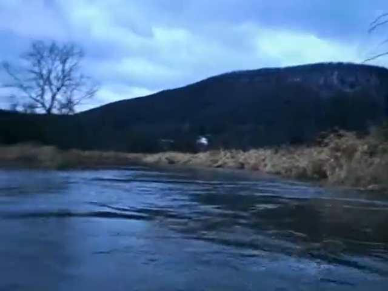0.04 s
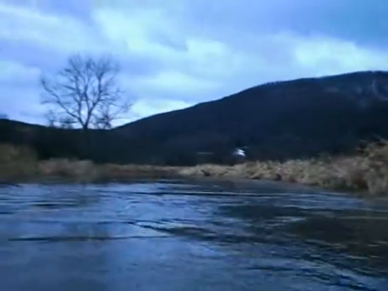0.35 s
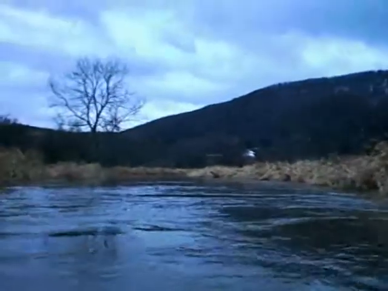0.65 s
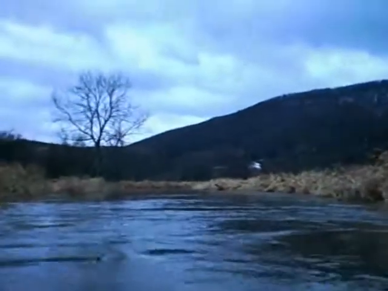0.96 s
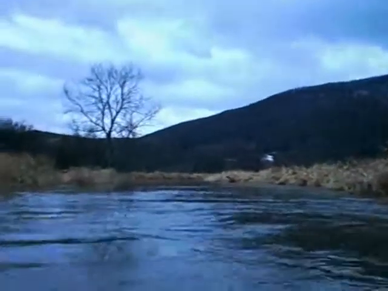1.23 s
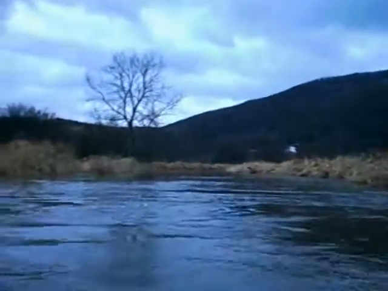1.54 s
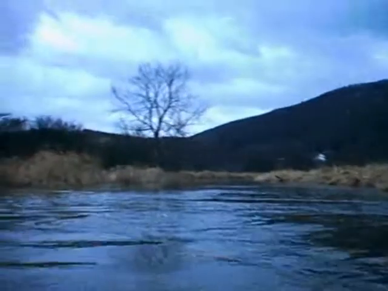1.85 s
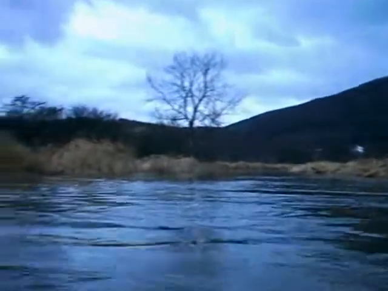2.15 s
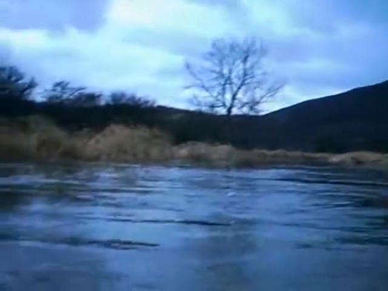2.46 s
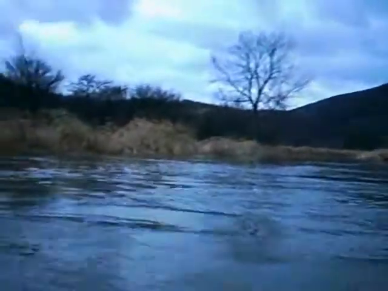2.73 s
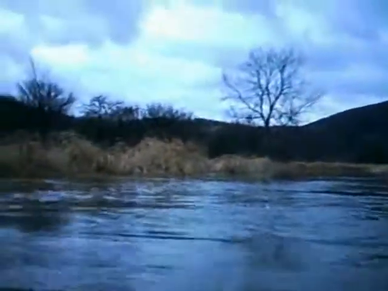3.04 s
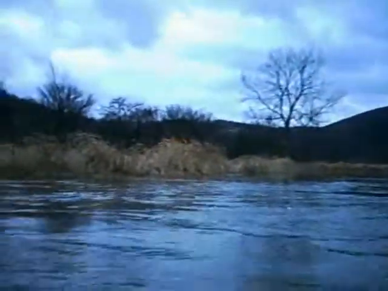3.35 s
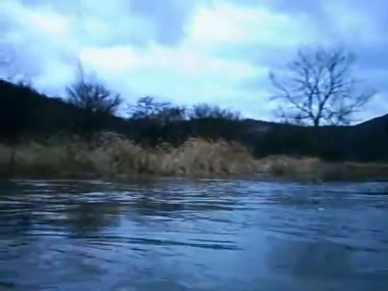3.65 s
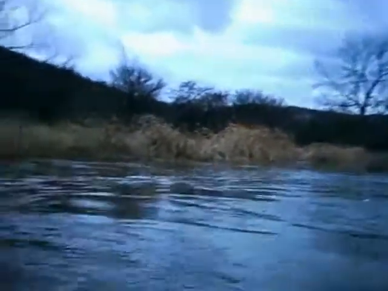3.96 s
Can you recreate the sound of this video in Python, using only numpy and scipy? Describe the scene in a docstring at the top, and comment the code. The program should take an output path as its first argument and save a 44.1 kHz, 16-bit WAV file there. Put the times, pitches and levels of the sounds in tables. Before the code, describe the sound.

Water laps and bubbles at a kayak's bow, heard close from the deck. A small wave washes past first, then lighter plips, glugs and splashes follow, with dull hull bumps over a faint river rush. The sound is slightly muffled.

```python
"""Kayak on a rippling river

Wavelets break at the bow into a fizz of tiny ringing bubbles, with single plips and rising glugs.
One wave washes along the boat in the first second. Water bumps the hollow hull, and the river
rushes farther off. We listen from a small waterproof camera on the deck. Its case rings a little,
and its low-quality recorder dulls the treble and overloads on the closest splashes."""
import sys
import numpy as np
from scipy import signal
from scipy.fft import rfft, irfft
from scipy.io import wavfile

SR = 44100
rng = np.random.default_rng(int(sys.argv[2]) if len(sys.argv) > 2 else 0)


def int16_out(signal):
    """Quantize to a 16-bit WAV file."""
    q = np.round(np.clip(np.atleast_2d(signal).T, -1, 1) * 32767)
    wavfile.write(sys.argv[1], SR, q.astype(np.int16))


N = 176400
TIME = np.arange(N) / SR


def from_db(db):
    """Turn decibels into a number to multiply a sound by."""
    return 10 ** (np.asarray(db) / 20)


def rms_one(x):
    """Scale a sound so that its average strength (rms) is 1."""
    return x / np.sqrt(np.mean(x ** 2) + 1e-20)


def add(out, start_s, sound):
    """Mix a sound in at its start time."""
    i = max(0, int(start_s * SR))
    out[i:i + len(sound)] += sound[:max(0, N - i)]


def shape_tone(x, points):
    """Make some pitches louder and others softer, following (pitch_hz, gain_db) points."""
    size = 2 * N
    hz, db = np.transpose(points)
    grid_hz = np.maximum(np.arange(N + 1) * SR / size, 1)
    gain = from_db(np.interp(np.log(grid_hz), np.log(hz), db))
    # minimum phase: the filter rings only after a sound, never before it
    cepstrum = irfft(np.log(gain))
    cepstrum[1:N] *= 2
    cepstrum[N + 1:] = 0
    return irfft(rfft(x, size) * np.exp(rfft(cepstrum)))[:N]


def band_noise(low_hz, high_hz, samples):
    """A hiss that lies mostly between two pitches."""
    band = signal.butter(2, [low_hz, high_hz], "band", fs=SR, output="sos")
    return rms_one(signal.sosfilt(band, rng.standard_normal(samples)))


def drift(rate_hz):
    """A smooth random wobble between -2 and 2, changing about rate_hz times a second."""
    white = rfft(rng.standard_normal(N))
    hz = np.arange(len(white)) * SR / N
    smooth = irfft(white / (1 + (hz / rate_hz) ** 4), N)
    return np.clip(rms_one(smooth), -2, 2)


def bubble(hz, ring_s):
    """One bubble's note swells and dies away while its pitch climbs."""
    rise = 0.02  # the pitch climbs 2% per ring time
    age = TIME[:int(8 * ring_s * SR) + 2] / ring_s
    return age * np.exp(1 - age) * np.sin(2 * np.pi * hz * ring_s * (age + rise * age ** 2 / 2))


def bubble_cloud(per_s, low_hz, high_hz, cycles, spread_db, busy=np.ones(N)):
    """Random bubbles that ring for about `cycles` swings; fewer but louder where `busy` is below 1."""
    out, draws = np.zeros(N), rng.random((16000, 6))
    for when, pitch, size, ring, sign, chance in draws[:int(per_s * N / SR)]:
        share = busy[int(when * N)]
        if chance > share:
            continue
        hz = low_hz + (high_hz - low_hz) * pitch
        size_db = min(-spread_db * np.log(1 - size), 4)  # the largest are 4 dB above the smallest
        gain = from_db(size_db) * np.sign(sign - .5) / np.sqrt(share)
        add(out, when * N / SR, gain * bubble(hz, cycles * (.5 + ring) / hz))
    return rms_one(out)


# The tone of the distant water: pitch_hz, gain_db
RIVER_TONE = [(25, -28.5), (60, -14), (130, -9.5), (300, -4.5), (700, -7.5), (1500, 0.5), (2800, 2.5),
              (3700, 4), (4300, -7.5)]

def river():
    """The even rush of the water farther off."""
    loudness = from_db(-24 + 0.4 * drift(rate_hz=42))
    return loudness * rms_one(shape_tone(rng.standard_normal(N), RIVER_TONE))


def droplets():
    """Tiny drops fall back on the water with sparse, sharp ticks."""
    return from_db(-26) * bubble_cloud(per_s=41, low_hz=3100, high_hz=4040, cycles=2.2, spread_db=0.5)


# Low thumps on the loudest splashes: start_s, level_db, pitch_hz, decay_s
LOW_THUMPS = [(0.275, -30.5, 102, 0.013), (0.599, -28, 121, 0.006), (0.733, -22, 140, 0.03),
              (3.7199, -18.5, 85.7, 0.0057)]

def thumps():
    """Short, low thumps with a burst of noise, mostly the sound of the recorder overloading."""
    out, t = np.zeros(N), TIME[:SR // 5]
    for start_s, level_db, pitch_hz, decay_s in LOW_THUMPS:
        note = np.sin(2 * np.pi * pitch_hz * t)
        burst = from_db(-5) * band_noise(low_hz=pitch_hz, high_hz=900, samples=len(t))
        add(out, start_s, from_db(level_db) * np.exp(-t / decay_s) * (note + burst))
    return out


# The tone of the hollow hull: pitch_hz, gain_db
HULL_TONE = [(70, -21), (140, -4), (200, 0), (355, 5.5), (600, 5.5), (900, -9), (2000, -20.5)]
# Water bumping the hull: start_s, level_db, decay_s
HULL_BUMPS = [(0.73, -13, .022), (0.752, -22, 0.014), (1.09, -17, 0.0047), (1.302, -22, 0.032),
              (1.826, -25, 0.12), (2.09, -27.5, 0.024), (2.143, -20.5, 0.0071), (2.197, -15, 0.0061),
              (3.404, -18, 0.017), (3.43, -22, 0.032), (3.471, -24.5, 0.017), (3.511, -21.5, 0.035),
              (3.597, -23.5, 0.024)]

def hull_bumps():
    """The hull gives a dull, hollow rumble each time water bumps it."""
    loudness, t = np.zeros(N), TIME[:SR // 2]
    fade_in = np.minimum(t / 0.00088, 1)
    for start_s, level_db, decay_s in HULL_BUMPS:
        add(loudness, start_s, from_db(level_db) * fade_in * np.exp(-t / decay_s))
    return loudness * rms_one(shape_tone(rng.standard_normal(N), HULL_TONE))


# Large bubbles coming to the surface: start_s, level_db, start_hz, end_hz, length_s
LARGE_BUBBLES = [(0.051, -17.5, 845, 1750, 0.044), (.69, -16, 791, 800, 0.067),
                 (0.874, -12.5, 832, 2040, 0.017), (0.959, -16, 750, 1200, 0.0086),
                 (1.004, 0, 2030, 3000, 0.0091), (1.947, -17, 907, 1800, 0.027),
                 (2.123, -14.5, 804.4, 870, 0.033), (2.157, -12.5, 1000, 1455, 0.017),
                 (2.275, -17.5, 804, 797, 0.062), (2.652, -14, 639, 1143, 0.035),
                 (2.808, -10, 1240, 1500, 0.015), (3.235, -13.5, 1070, 1300, 0.009),
                 (3.256, -11, 1352, 1860, 0.027), (3.723, -4.5, 1367, 1316, 0.013),
                 (3.897, -16.5, 900, 860, 0.018), (3.922, -17, 920, 1300, 0.016),
                 (3.948, -16, 1360, 1900, 0.015)]

def glugs():
    """Pockets of air ring with a wobbling loudness; most slide up in pitch, faster and faster."""
    out = np.zeros(N)
    for start_s, level_db, start_hz, end_hz, length_s in LARGE_BUBBLES:
        age = np.linspace(0, 1, int(length_s * SR))
        hz = start_hz + (end_hz - start_hz) * age ** 1.7
        swell = np.minimum(age / 0.23, 1) * np.sqrt(1 - age)  # loudest 23% of the way through
        note = np.sin(2 * np.pi * np.cumsum(hz) / SR)
        add(out, start_s, from_db(level_db + 1) * swell * note)
    wobble_db = 1.5 * drift(rate_hz=170)
    return out * from_db(wobble_db)


# Wavelets that land flat: start_s, level_db, decay_s
FLAT_WAVELETS = [(0.271, -7, 0.011), (2.5398, 0, 0.0056), (2.5842, -3, 0.0048), (2.675, -7.5, 0.012),
                 (3.7207, -2, 0.0068), (3.781, -6, 0.011)]

def splats():
    """A wavelet slaps down and bursts into a rough spray that dies within moments."""
    loudness, t = np.zeros(N), TIME[:SR // 5]
    for start_s, level_db, decay_s in FLAT_WAVELETS:
        add(loudness, start_s, from_db(level_db) * np.exp(-t / decay_s))
    return loudness * band_noise(low_hz=1200, high_hz=2870, samples=N)


# Single bubbles close by: start_s, level_db, pitch_hz, ring_ms
CLOSE_BUBBLES = [(0.001, 10, 1697, 1.25), (0.014, -5, 2800, 3.1), (0.043, -3, 2535, 1.4),
                 (0.0516, -1.5, 2650, 0.98), (0.1551, -1, 1504, 1), (0.2244, -1, 2490, 1.4),
                 (0.2693, 0, 2520, 1.6), (0.2761, 2, 1903, 2.17), (0.3157, -6, 2446, 2.7),
                 (0.3583, -3, 2580, 2.6), (0.388, -2, 977, 1.3), (0.394, -2, 1358, 1.8),
                 (0.4224, -3.5, 2355, 6), (0.449, 0.5, 2450, 1.2), (0.4525, 0.5, 2810, 2),
                 (0.461, -2.5, 2670, 3.2), (0.5072, -3, 2760, 2.6), (0.516, -4.5, 2870, 1.5),
                 (0.547, -4.5, 2430, 1.7), (0.5266, -1.5, 2210, 2.6), (0.557, -5, 2730, 1.6),
                 (0.568, -1.5, 2717, 1.6), (0.5942, -1.5, 992, 3.8), (0.632, -8.5, 880, 1.8),
                 (0.6368, -4.5, 2663, 2.9), (0.649, -4.5, 2760, 1.76), (0.659, -3.5, 2210, 0.91),
                 (0.6642, -2.5, 2400, 0.96), (0.6785, -5, 2730, 0.79), (0.6861, -2.5, 2495, 0.78),
                 (0.7282, -5.5, 880, 1.8), (0.766, 2, 2316, 0.41), (0.775, 2, 2680, 1.16),
                 (0.848, 0, 2790, 1.6), (0.8774, -5, 1400, 1.5), (0.8965, -0.5, 2710, 1.67),
                 (0.942, 1, 2750, 0.96), (0.9684, 4, 2420, 0.88), (1.0354, -9.5, 2330, 2.6),
                 (1.0929, -4, 2390, 1.1), (1.1356, -9, 2130, 1.1), (1.1878, -11.5, 2560, 1.3),
                 (1.275, -10.5, 2360, 0.98), (1.378, -8, 2800, 0.55), (1.3917, -5, 3740, 1.55),
                 (1.469, -12.5, 1400, 1.3), (1.559, -2.5, 3440, 0.69), (1.696, -8.5, 2730, 2.9),
                 (1.7076, -4.5, 3020, 2), (1.7281, 2, 1670, 0.53), (1.7396, 2.5, 2460, 0.17),
                 (1.805, 3.5, 2750, 0.88), (1.815, -7, 2610, 1.5), (1.827, -7.5, 2140, 1.5),
                 (1.866, -9.5, 2720, 2.2), (1.9292, 1, 2830, 0.97), (1.9854, 3, 1880, 0.88),
                 (2.0526, -6, 2960, 0.74), (2.1234, -5.5, 2570, 0.67), (2.1272, -8.5, 797, 2.8),
                 (2.2685, -4, 2830, 1.1), (2.3474, -5.5, 2780, 2.4), (2.385, -8, 2170, 0.4),
                 (2.4744, -6.5, 1370, 1.1), (2.4998, -7.5, 2880, 1.2), (2.5386, -1.5, 1805, 1),
                 (2.5838, -1.5, 950, 0.83), (2.6088, -5.5, 2680, 1.4), (2.6244, -7.5, 2830, 0.57),
                 (2.642, -11.5, 2120, 1.7), (2.6513, -4.5, 2000, 1.57), (2.6618, -4, 1044, 1.1),
                 (2.678, -5.5, 2100, 1.15), (2.6835, 0.5, 1820, 0.52), (2.7331, -7, 2520, 0.75),
                 (2.7453, -4.5, 2880, 1.2), (2.8352, -3.5, 2755, 1.6), (2.86, -4, 2800, 3.3),
                 (2.8789, 3.5, 3135, 1.2), (2.8928, -5.5, 2640, 2.1), (2.9159, -3, 2476, 2.3),
                 (2.9608, -1.5, 1890, 0.61), (3.0143, -10, 2010, 1.1), (3.1231, -6.5, 2310, 3),
                 (3.1378, -2.5, 2650, 1.3), (3.189, -8, 2680, 0.98), (3.2148, -5.5, 1500, 0.69),
                 (3.2563, -5.5, 1737, 1.4), (3.27, -9, 1680, 2), (3.2983, 0, 2776, 0.91),
                 (3.3706, -5.5, 2020, 1.26), (3.3832, -4, 2180, 0.39), (3.4113, 5.5, 2823, 0.68),
                 (3.4141, -2.5, 2780, 0.77), (3.4316, -5.5, 672, 0.66), (3.516, -8.5, 1430, 1.24),
                 (3.551, -9.5, 2750, 1.15), (3.576, -10.5, 2000, 0.7), (3.5833, -2.5, 1696, 1.5),
                 (3.712, -8, 2780, 1.6), (3.721, 3.5, 1410, 0.84), (3.725, -7, 2690, 3.2),
                 (3.754, -8, 2370, 0.76), (3.7886, -1.5, 2730, 0.9), (3.802, -6, 1700, 0.71),
                 (3.8134, -3, 2180, 1.2), (3.8305, -7.5, 2590, 1.6), (3.8398, -7.5, 2540, 1.9),
                 (3.849, -7, 2360, 1.1), (3.9368, -2, 2620, 2.2), (3.952, -4.5, 2740, 1.4),
                 (3.9568, -6, 2030, 1.6), (3.984, -8.5, 2650, 3.3)]

def plips():
    """Each close bubble rings briefly, trailed by a short spray of smaller ones."""
    notes, spray_loudness = np.zeros(N), np.zeros(N)
    spray_fade = np.exp(-TIME[:SR // 20] / 0.0052)
    for start_s, level_db, pitch_hz, ring_ms in CLOSE_BUBBLES:
        add(notes, start_s, from_db(level_db + 2) * bubble(pitch_hz, ring_ms / 1000))
        add(spray_loudness, start_s, from_db(level_db - 8) * spray_fade)
    spray = bubble_cloud(per_s=2400, low_hz=734, high_hz=4520, cycles=1.0, spread_db=0.5)
    spray = shape_tone(spray, [(600, -15.0), (1200, -5.5), (2600, 12), (4000, 5.5)])
    return notes + spray_loudness * rms_one(spray)


# The tone of the small, fizzing bubbles: pitch_hz, gain_db
FIZZ_TONE = [(700, -19), (1300, -16), (1800, -2.5), (2800, 3), (3300, -3.5), (4200, -6.5)]
# The tone of the large, gurgling bubbles: pitch_hz, gain_db
GURGLE_TONE = [(200, -18), (400, -15), (600, -10.5), (800, -4), (1000, -1), (1270, 3), (1600, -2.5),
               (2400, -21)]
# How the wash swells and fades: time_s, fizz_db, gurgle_db
WASH_LEVELS = [(0, -14.5, -25), (.2, -24.5, -28.5), (.27, -23.5, -15), (.39, -20, -23), (0.459, -14, -16),
               (0.571, -17.5, -18), (0.681, -18, -13.5), (.81, -20, -25.5), (.93, -17.5, -26),
               (1.07, -24, -29.5), (1.25, -28, -31.5), (1.59, -31.5, -28), (1.749, -26.5, -25),
               (2.23, -27.5, -30), (2.29, -24.5, -36), (2.4, -27.5, -23.5), (2.701, -26.5, -26),
               (2.921, -19, -30), (3.05, -27.5, -28), (3.201, -20.5, -28.5), (3.47, -29.5, -32),
               (3.68, -22.5, -27.5), (3.79, -17.5, -30), (3.87, -25, -30), (4, -20.5, -39)]

def bow_wash():
    """Breaking wavelets fizz and gurgle in small spurts; in calm water the fizz thins to a trickle."""
    time_s, fizz_db, gurgle_db = np.transpose(WASH_LEVELS)
    spurts_db = 1.8 * drift(rate_hz=25)
    busy = from_db(.8 * np.interp(TIME, time_s, fizz_db - fizz_db.max()))  # quieter means fewer bubbles
    fizz = bubble_cloud(per_s=3400, low_hz=1127, high_hz=4342, cycles=1.4, spread_db=2, busy=busy)
    fizz = rms_one(shape_tone(fizz, FIZZ_TONE))
    fizz *= from_db(6.5 + np.interp(TIME, time_s, fizz_db) + spurts_db)
    gurgle = bubble_cloud(per_s=900, low_hz=378, high_hz=1735, cycles=1.69, spread_db=0)
    gurgle = rms_one(shape_tone(gurgle, GURGLE_TONE))
    gurgle *= from_db(1.5 + np.interp(TIME, time_s, gurgle_db) + spurts_db)
    return fizz + gurgle


# The notes at which the camera's case rings: pitch_hz, gain_db, width_hz
CASE_NOTES = [(692.5, -5, 56), (823, -0.5, 33), (997, -5, 39), (1244, -6.5, 51)]

def case_ring(x):
    """The case rings on after every splash; a narrower note rings longer."""
    out = x.copy()
    for pitch_hz, gain_db, width_hz in CASE_NOTES:
        r = np.exp(-np.pi * width_hz / SR)  # the share of the ring left after one sample
        feed_in = np.array([1, 0, -1]) * (1 - r * r) / 2
        feedback = [1, -2 * r * np.cos(2 * np.pi * pitch_hz / SR), r * r]
        out += from_db(gain_db) * signal.lfilter(feed_in, feedback, x)
    return out


def scene():
    """The water sounds ring through the case, and the low thumps are added on top."""
    water = bow_wash() + plips() + splats() + droplets() + glugs() + hull_bumps() + river()
    return (from_db(-2) * case_ring(water) + thumps())[None]


def soft_clip(x, ceiling, hardness):
    """Squash peaks to stay under a ceiling; more hardness gives flatter tops."""
    return x / (1 + (x / ceiling) ** hardness) ** (1 / hardness)


# The low-quality recorder dulls the treble above 3 kHz and cuts it near 4.5 kHz: pitch_hz, gain_db
RECORDER_TREBLE_CUT = [(2900, -2), (3020, -7), (3180, -11.5), (3400, -11), (3700, -5.5), (3900, -10.5),
                       (4100, -12.5), (4450, -28), (4700, -67.5)]

def record(dry):
    """The recorder overloads on loud splashes, loses treble and deep bass, and flattens the last peaks."""
    bass_cut = signal.butter(2, 69, "high", fs=SR, output="sos")  # below 69 Hz
    top_cut = signal.cheby2(12, 70, 17000, fs=SR, output="sos")  # 70 dB down from 17000 Hz up
    overloaded = soft_clip(dry[0], ceiling=.77, hardness=6)
    dulled = signal.sosfilt(bass_cut, shape_tone(overloaded, RECORDER_TREBLE_CUT))
    flattened = soft_clip(dulled, ceiling=.715, hardness=40)
    return signal.sosfilt(top_cut, flattened)[None]


dry = scene()
out = record(dry)
int16_out(out)
```